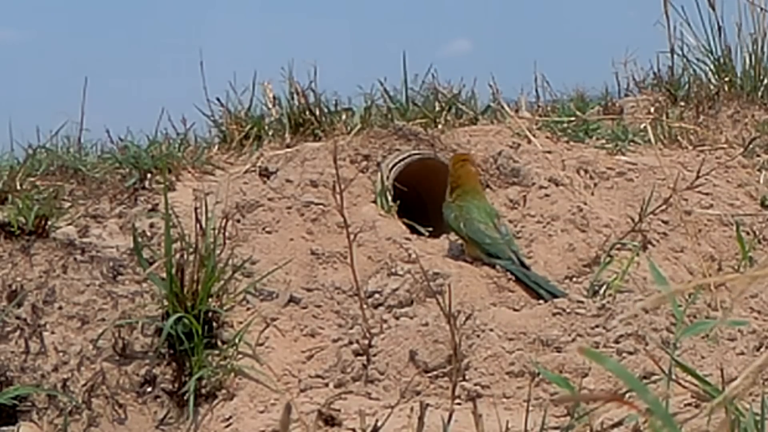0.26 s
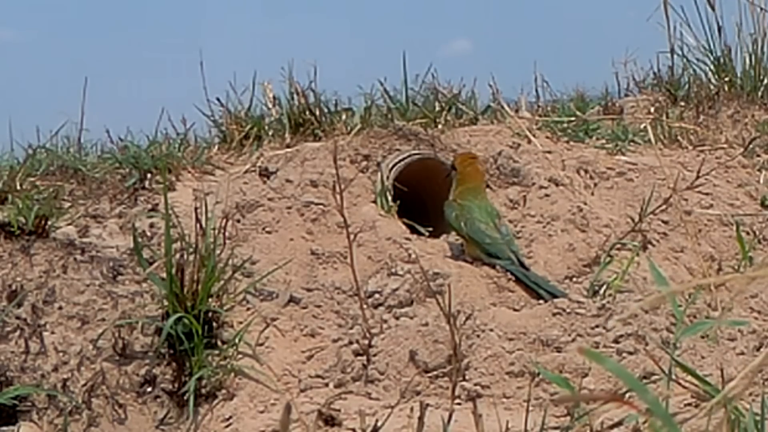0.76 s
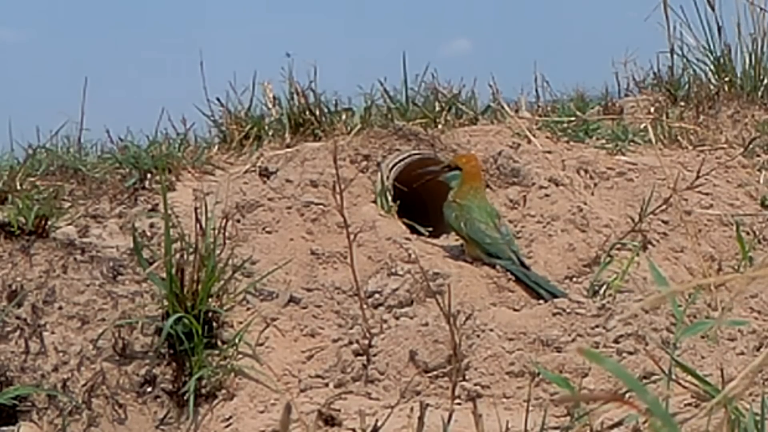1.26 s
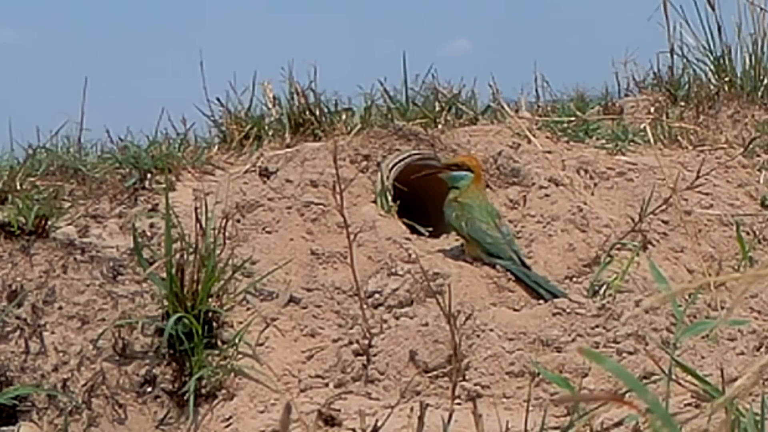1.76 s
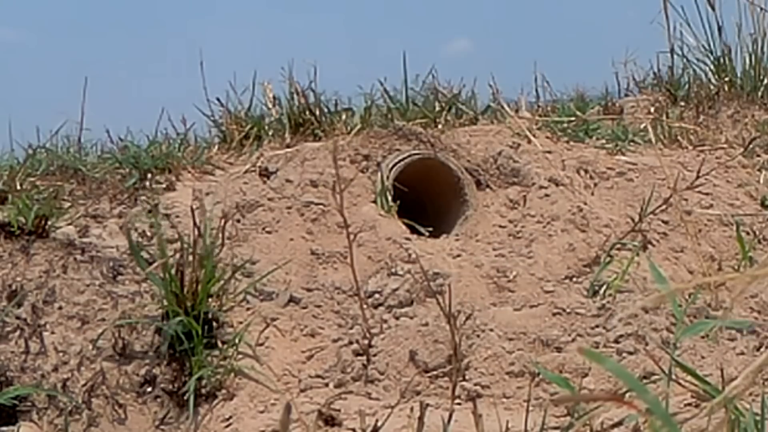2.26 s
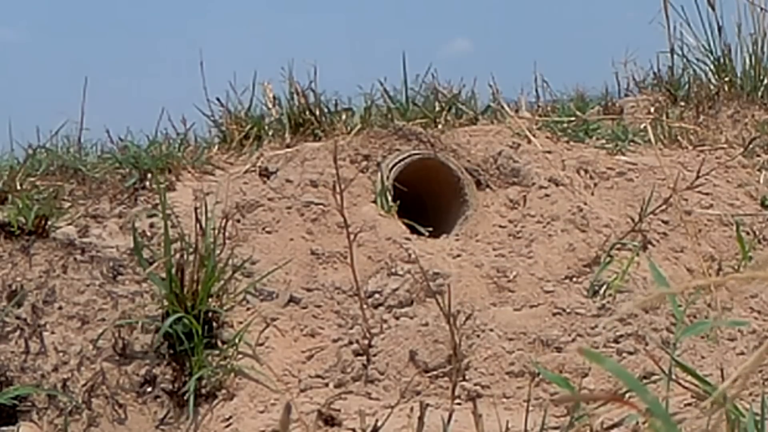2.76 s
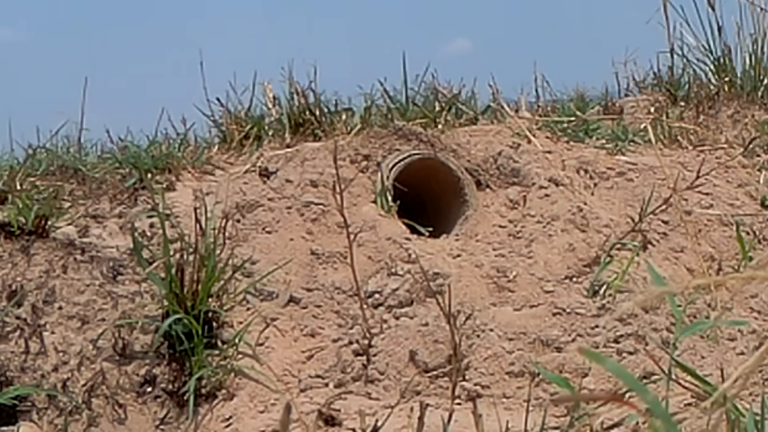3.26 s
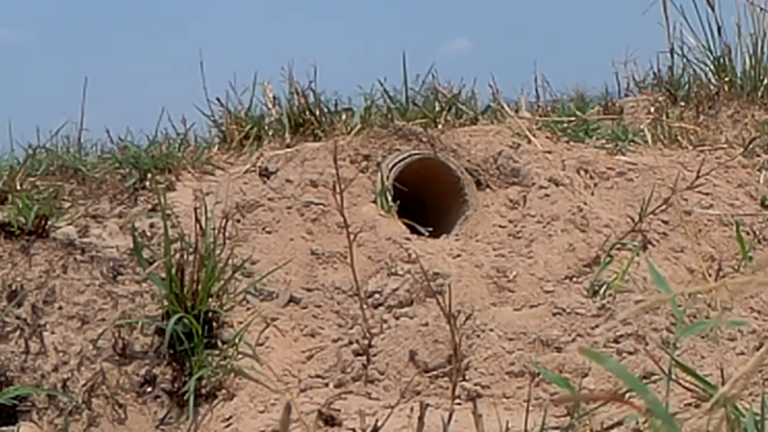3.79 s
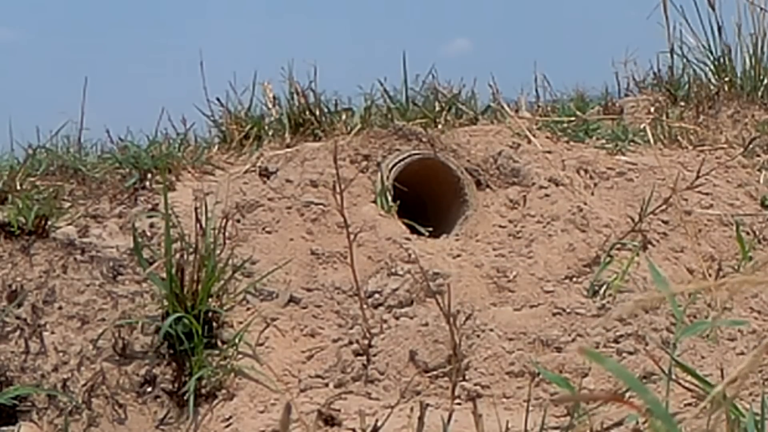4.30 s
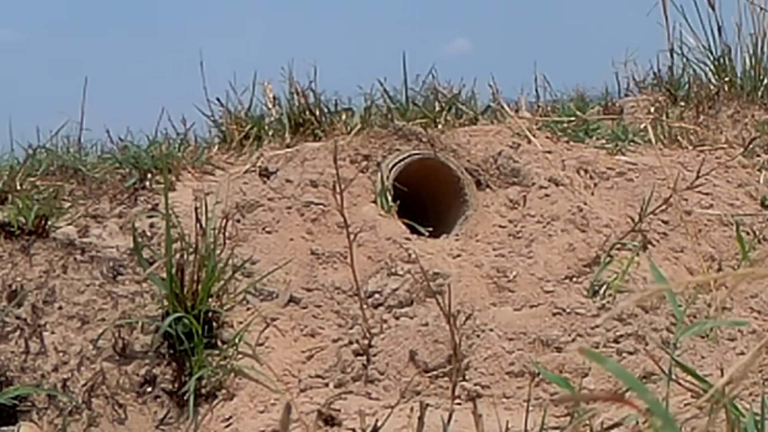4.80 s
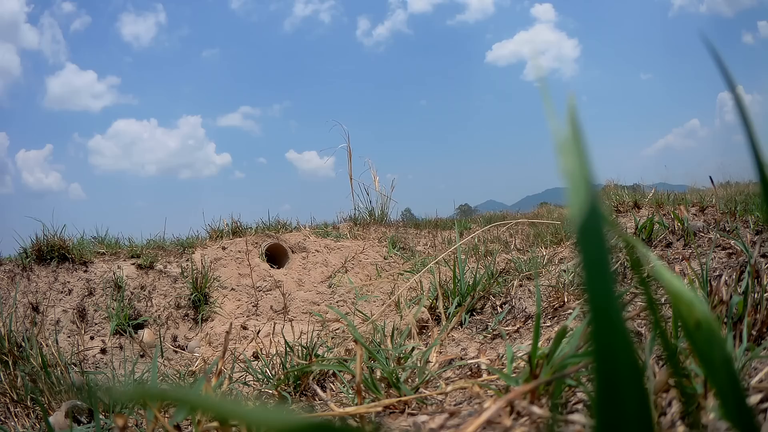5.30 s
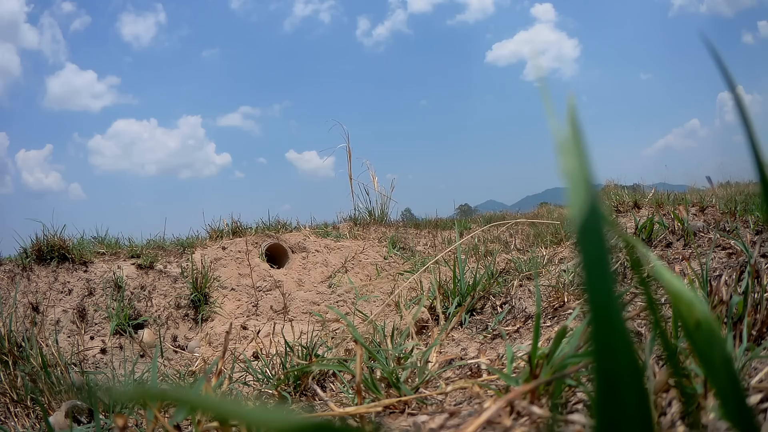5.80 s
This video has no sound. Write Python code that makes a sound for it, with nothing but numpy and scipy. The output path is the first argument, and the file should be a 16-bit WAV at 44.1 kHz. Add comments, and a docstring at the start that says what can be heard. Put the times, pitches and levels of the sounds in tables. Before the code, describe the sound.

Soft bird whistles and buzzy trills in quiet open air, then a quick burst of ten high chirps that fades away.

```python
"""In quiet open air, soft bird phrases repeat: an arched whistle, a buzzy trill and a short closing slur.
They echo faintly off a sandy bank. Two seconds in, a bee-eater starts a quick burst of ten high calls,
each a rising whistle that cracks to a low note, then a falling whistle that cracks in from below.
A hiss swells under the burst, and the bird leaves its burrow with one puff of its wings.
The calls stop and the hiss dies away, leaving the air; near the end the level dips briefly."""
import sys
import numpy as np
from scipy import signal
from scipy.fft import rfft, irfft
from scipy.io import wavfile
from scipy.ndimage import uniform_filter1d

SR = 44100
rng = np.random.default_rng(int(sys.argv[2]) if len(sys.argv) > 2 else 0)


def output_pcm(signal):
    """Save a mono or channel-first signal as 16-bit PCM at the path in sys.argv[1].

    Samples are clipped to [-1, 1] before scaling.
    """
    pcm = np.clip(np.atleast_2d(signal).T, -1, 1) * 32767
    wavfile.write(sys.argv[1], SR, np.round(pcm).astype(np.int16))


N = 266805
TIME = np.arange(N) / SR

# Tone colour of the open air: f/Hz, relative level/dB
AIR_COLOUR = [(15, -41), (25, -5.5), (96, -2.5), (140, -2), (173, -1), (209, -2), (274, -2), (305, -1),
              (614, -2), (782, -3.5), (970, -4.5), (3090, -11.5), (7500, -16.5), (13500, -21), (15500, -27)]
# Soft phrases: start t/s, trill end t/s, arch top f/Hz, arch level/dB, arch flutter (rate and depth) f/Hz,
# then the tone between the trill's pulses: f/Hz, final level/dB
SOFT_PHRASES = [(-.3, .026, 3600, -52, 220, 3000, -54), (.108, .464, 3700, -50.5, 220, 2980, -58.5),
                (.547, .847, 3760, -50.5, 200, 3215, -58.5), (.936, 1.214, 4000, -51, 50, 3215, -60),
                (1.302, 1.61, 4000, -52, 40, 3190, -63), (1.712, 2.084, 4090, -52.5, 40, 3230, -63.5),
                (2.154, 2.386, 3950, -49.5, 40, 3170, -64)]
# The trills grow more insistent over time: t/s, level/dB
TRILL_LEVELS = [(0, -60), (.2, -62), (.6, -64), (.8, -56), (1.3, -52.7), (2.1, -53.5), (2.39, -45)]
# Loud calls: start t/s, rise length t/s, rise attack t/s, pause between whistles t/s, fall length t/s,
# rise end f/Hz, fall start f/Hz, rise level/dB, fall level/dB, cracks against whistles level/dB
LOUD_CALLS = [(2.0423, .0129, 0.0089, 0.014, .011, 3300, 3570, -33, -34, -6.5),
              (2.119, .0151, .018, 0.013, 0.0094, 3300, 3900, -24, -26.5, -5.5),
              (2.2078, .0180, .009, 0.014, 0.012, 3520, 4030, -19.7, -20.5, -13.5),
              (2.321, 0.021, .012, .0128, 0.013, 3570, 4030, -19, -22, -13),
              (2.4494, 0.023, .015, 0.012, 0.015, 3750, 4050, -20.5, -27.5, -17),
              (2.5507, 0.021, 0.0095, 0.013, 0.013, 3530, 4110, -25, -27.5, -11.5),
              (2.6608, .0205, .008, .0141, 0.012, 3500, 4120, -25.6, -25.6, -17),
              (2.7718, 0.021, 0.0098, .0147, .0124, 3480, 4230, -31, -25.6, -18),
              (2.8865, .0181, .012, 0.014, 0.0093, 3396, 4140, -30.5, -31, -16),
              (3.055, 0.016, .011, 0.013, .0117, 3385, 3990, -33, -36.2, -13.5)]
# Tone colour of the hiss under the burst: f/Hz, relative level/dB
HISS_COLOUR = [(200, -12), (600, 0), (1200, 0), (2500, -4), (5000, -9), (10000, -11.5), (13000, -13.5),
               (15500, -20)]
# Tone colour of the air pushed by the wings: f/Hz, relative level/dB
WING_COLOUR = [(20, -12), (50, 1), (95, 3), (180, -5), (400, -37), (1500, -57)]


def undb(db):
    """Turn decibels into a gain to multiply by."""
    return 10 ** (np.asarray(db) / 20)


def add(out, start, sound):
    """Mix a sound into the track at its start time, which may be before zero."""
    i = int(start * SR)
    sound, i = sound[max(-i, 0):], max(i, 0)
    out[i:i + len(sound)] += sound[:N - i]


def progress(length):
    """A ramp from 0 to 1 over a length in seconds; called u below."""
    return np.linspace(0, 1, max(int(length * SR), 8))


def bend(u, first, middle, last):
    """A smooth curve (a parabola) through three values."""
    return first + (4 * middle - 3 * first - last) * u + 2 * (first + last - 2 * middle) * u ** 2


def edges(u, fade_in, fade_out):
    """Fade a sound in and out, each over a share of its length."""
    return np.sin(np.pi / 2 * np.clip(np.minimum(u / fade_in, (1 - u) / fade_out), 0, 1)) ** 2


def wobble(size, rate_hz):
    """A random wavy line, mostly between -1 and 1."""
    at = np.arange(size) * rate_hz / SR
    points = rng.standard_normal(int(at[-1]) + 2)
    return np.interp(at, np.arange(len(points)), points)


def noise(colour):
    """Noise of strength 1, shaped by a tone colour table."""
    hz, db = np.transpose(colour)
    bin_hz = np.maximum(np.arange(N // 2 + 1) * SR / N, 1)
    gain = undb(np.interp(np.log(bin_hz), np.log(hz), db))
    shaped = irfft(rfft(rng.standard_normal(N)) * gain, N)
    return shaped / shaped.std()


def open_air(db=-54.5):
    """The quiet, almost steady rush of open air."""
    return noise(AIR_COLOUR) * undb(db + .052 * wobble(N, 7.4))


def tone(hz, octave_db):
    """A bird's voice organ makes a pure tone plus a weaker one an octave higher."""
    phase = 2 * np.pi * (np.cumsum(hz) / SR + rng.random())
    return np.sqrt(2) * (np.sin(phase) + undb(octave_db) * np.sin(2 * phase))


def trills(arch_s, pulse_hz=120, low_hz=2400, sweep_hz=650, growth_db=6):
    """Buzzy runs of tiny downward chirps; a higher tone grows between them and slides into a slur."""
    out = np.zeros(N)
    for start, end, *_, upper_hz, upper_db in SOFT_PHRASES:
        length = end - start - arch_s
        u = progress(length)
        db = np.interp(start + arch_s + u * length, *np.transpose(TRILL_LEVELS))
        cycle = np.cumsum(pulse_hz * (1 + .07 * wobble(len(u), 90))) / SR % 1  # 0 to 1 in each chirp
        pulse = np.sin(np.pi * cycle) ** 2
        chirp_hz = low_hz + sweep_hz * (.5 - cycle) + 90 * wobble(len(u), 200)
        chirps = undb(db) * pulse ** 2 * tone(chirp_hz, octave_db=-26)
        slide_hz = 420 * np.exp((u - 1) * length / .009)  # only matters at the very end
        upper = tone(upper_hz - slide_hz + 150 * wobble(len(u), 400), octave_db=-26)
        upper *= (1 - pulse) * undb(upper_db + growth_db * (u - 1))
        unevenness = undb(1.5 * wobble(len(u), 110))
        add(out, start + arch_s, unevenness * (chirps + upper))
        add(out, end, slur(db[-1] - 1.5))
    return out


def slur(db):
    """The short downward note that closes a trill."""
    u = progress(.0153)
    return undb(db) * tone(bend(u, 2520, 2460, 1980), octave_db=-25) * edges(u, .24, .33)


def arches(length, foot_hz=2980, droop_hz=220, thin_db_per_khz=-16.5, fade_db=-4.5):
    """Soft grainy whistles that swing up, thin out at the top and slide down towards the next trill."""
    out = np.zeros(N)
    u = progress(length)
    arch = np.sin(np.pi * u ** .78) ** 1.7
    for start, _, top_hz, db, flutter_hz, *_ in SOFT_PHRASES:
        flutter = flutter_hz * np.sin(2 * np.pi * flutter_hz * length * u)
        hz = foot_hz + (top_hz - foot_hz) * arch - droop_hz * u ** 4 + flutter
        thinning_db = thin_db_per_khz * np.maximum(hz - 3430, 0) / 1000
        grain = undb(2.2 * wobble(len(u), 330))
        gain = undb(db + thinning_db + fade_db * u) * grain * edges(u, .053, .064)
        add(out, start, gain * tone(hz + 60 * wobble(len(u), 860), octave_db=-13))
    return out


def bank_echoes(calls, sand=(-24, .022), grass=(-27.5, .11), land=(-37, .7)):
    """Sand and grass add brief echoes, the land beyond a faint tail; each is (level/dB, fade t/s)."""
    t = TIME[:SR]
    out = calls.copy()
    for db, fade_s in (sand, grass, land):
        decay = undb(-60 * t / fade_s) * (t > .002)
        echo = rng.standard_normal(SR) * decay
        out += undb(db) * signal.fftconvolve(calls, echo / np.linalg.norm(echo))[:N]
    return out


def whistle(length, pitches, db):
    """Pitch and gain curves for a clear note that wavers only slightly."""
    u = progress(length)
    hz = bend(u, *pitches) * (1 + .0071 * wobble(len(u), 780))
    return np.array([hz, undb(db + .45 * wobble(len(u), 290))])


def crack(length, pitches, levels):
    """Pitch and gain curves for the voice breaking into a rough low note."""
    u = progress(length)
    hz = bend(u, *pitches) * (1 + .075 * wobble(len(u), 1800))
    return np.array([hz, undb(bend(u, *levels) + 1.3 * wobble(len(u), 1800))])


def voice_jump(first, second, octaves_db, dip_db=-4.5, dip_s=.0008, fade_s=.0014):
    """One voice jumps from the first note to the second, faltering for an instant."""
    sizes = [first.shape[1], second.shape[1]]
    curves = np.vstack([np.hstack([first, second]), np.repeat(octaves_db, sizes)])
    hz, gain, octave_db = uniform_filter1d(curves, size=34, axis=1)  # rounds off the jump
    from_jump_s = (np.arange(len(hz)) - sizes[0]) / SR
    falter = undb(dip_db * np.exp(-(from_jump_s / dip_s) ** 2))
    fade = fade_s * SR / len(hz)
    return tone(hz, octave_db) * gain * falter * edges(np.linspace(0, 1, len(hz)), fade, fade)


def rise(length, attack_s, top_hz, db, crack_db, from_hz=2934, onset_db=-13.5):
    """A whistle that climbs, grows to full strength and cracks down to a low note."""
    middle_hz = from_hz + .73 * (top_hz - from_hz)
    shape_db = onset_db * np.maximum(1 - progress(length) * length / attack_s, 0)
    high = whistle(length, (from_hz, middle_hz, top_hz), db + shape_db)
    low = crack(.007, (2250, 2150, 2220), db + crack_db + np.array([1, -5, -17]))
    # Taking away db keeps the whistle's octave equally faint, however loud the call.
    return voice_jump(high, low, octaves_db=(-57 - db, -7))


def fall(length, top_hz, db, crack_db, crack_s, onset_db=1.5, end_db=-9):
    """A low crack that jumps up into a sinking, fading whistle."""
    low = crack(crack_s, (2280, 2450, 3100), db + crack_db + np.array([-8, 3, -4]))
    u = progress(length)
    shape_db = np.where(u < .5, onset_db, end_db) * (2 * u - 1) ** 2
    high = whistle(length, (top_hz, top_hz - 275, top_hz - 490), db + shape_db)
    return voice_jump(low, high, octaves_db=(-14, -61 - db))


def burst(crack_s=.0031):
    """The ten loud calls, each a rise, a short gap and a fall."""
    out = np.zeros(N)
    for start, rise_s, attack_s, pause_s, fall_s, rise_hz, fall_hz, rise_db, fall_db, crack_db in LOUD_CALLS:
        add(out, start, rise(rise_s, attack_s, rise_hz, rise_db, crack_db))
        add(out, start + rise_s + pause_s - crack_s, fall(fall_s, fall_hz, fall_db, crack_db, crack_s))
    return out


def swell(start, end, up_db_per_s, down_db_per_s):
    """A gain that grows, stays full from start to end, then fades."""
    return undb(-up_db_per_s * np.maximum(start - TIME, 0) - down_db_per_s * np.maximum(TIME - end, 0))


def hiss(db=-54.2):
    """A hiss that swells quickly, holds under the burst and dies away slowly."""
    return noise(HISS_COLOUR) * undb(db) * swell(2.08, 3.08, up_db_per_s=110, down_db_per_s=24.5)


def wing_puff(at_s=2.22, db=-60):
    """One downstroke of the wings pushes a low puff of air at take-off."""
    return noise(WING_COLOUR) * undb(db) * swell(at_s, at_s, up_db_per_s=170, down_db_per_s=260)


def scene(arch_s=.057):
    """The calls and their echoes join the air, wings and hiss; the level dips briefly near the end."""
    calls = burst() + arches(arch_s) + trills(arch_s)
    mix = bank_echoes(calls) + open_air() + wing_puff() + hiss()
    dip = np.interp(TIME, [5.295, 5.31, 5.325], [1, .4, 1])
    return (dip * mix)[None]


def record(dry, mirror_hz=16000, mirror_db=-35, top_hz=15800):
    """Add a faint upside-down copy of the whistles high in the treble, then cut the very top."""
    whistles = signal.sosfilt(signal.butter(2, [2800, 4300], "band", fs=SR, output="sos"), dry)
    mirror = 2 * np.cos(2 * np.pi * mirror_hz * TIME) * whistles
    top_cut = signal.ellip(10, .2, 70, top_hz, fs=SR, output="sos")
    return signal.sosfilt(top_cut, dry + undb(mirror_db) * mirror)


dry = scene()
out = record(dry)
output_pcm(out)
```